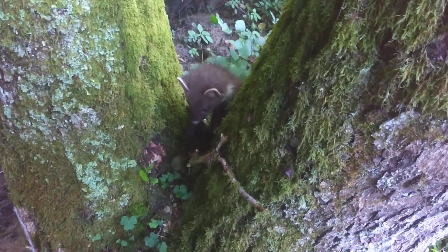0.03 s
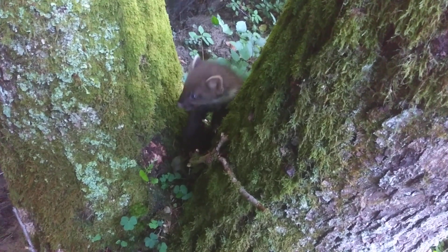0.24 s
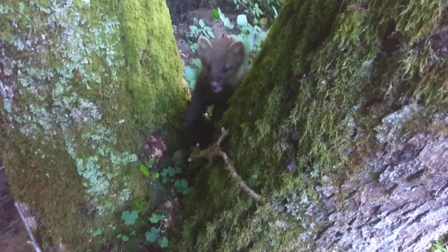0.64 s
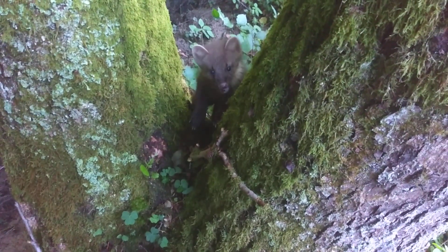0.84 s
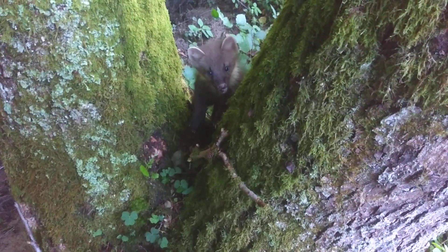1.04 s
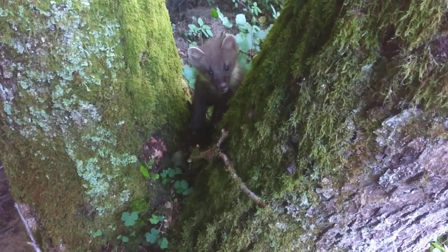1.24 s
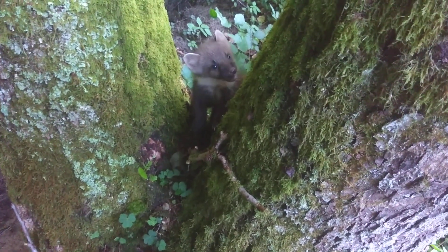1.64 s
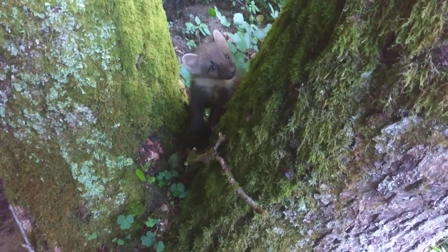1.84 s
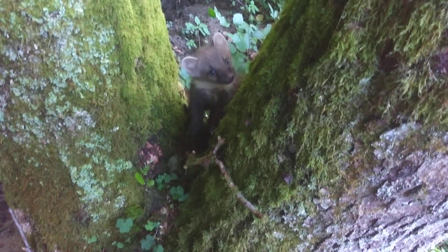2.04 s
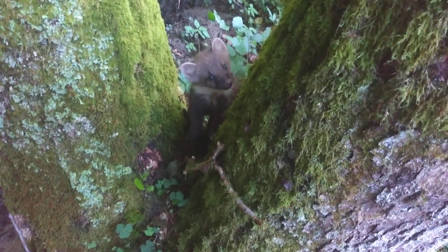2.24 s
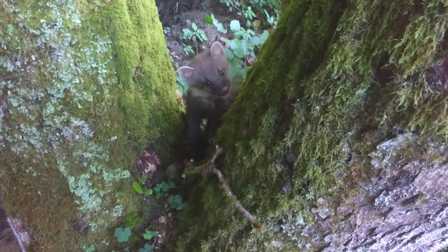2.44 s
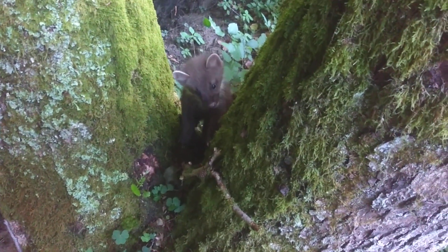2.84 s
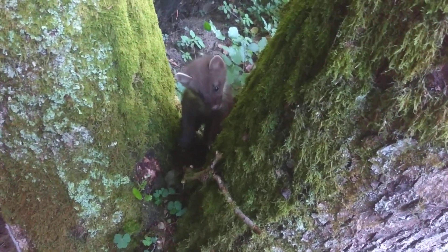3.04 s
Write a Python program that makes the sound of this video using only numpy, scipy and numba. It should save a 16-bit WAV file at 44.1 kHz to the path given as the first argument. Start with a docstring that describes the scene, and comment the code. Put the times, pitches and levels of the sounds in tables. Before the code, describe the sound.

A marten gives one harsh squawk, followed by faint squeaks and soft bumps, then a long fluttering growl that opens into a snarl. It is close to the microphone, with steady distant forest hiss behind.

```python
"""In a forest, a marten in the fork of a mossy tree gives one harsh squawk, then a long fluttering
growl whose mouth opens, closes and opens again into a snarl. Its voice is uneven vocal pulses and
breath ringing in the throat and mouth, reflected off the trunks. Faint squeaks and soft bumps lie over
the steady far hiss of the forest. The stereo microphone has two unequal ports, and the recorder
widens the image by delayed cross-feed."""
import sys
import numpy as np
from scipy import signal
from scipy.fft import rfft, irfft
from scipy.io import wavfile
from scipy.ndimage import uniform_filter1d
from numba import njit

SR = 44100
rng = np.random.default_rng(int(sys.argv[2]) if len(sys.argv) > 2 else 0)


def materialize(psi):
    """Save the field psi as 16-bit PCM at rate SR to the path in sys.argv[1].

    A 1-D psi becomes a single channel; in a 2-D psi each row is a channel.
    """
    bounded = np.clip(np.atleast_2d(psi).T, -1, 1)
    quanta = np.round(bounded * 32767).astype(np.int16)
    wavfile.write(sys.argv[1], SR, quanta)


N = 141120
T = np.arange(N) / SR
BIN_HZ = np.arange(N // 2 + 1) * SR / N


def from_db(db):
    """Decibels to gain."""
    return 10 ** (np.asarray(db) / 20)


def rms_one(x):
    """Scale to rms 1."""
    return x / np.sqrt(np.mean(x ** 2) + 1e-20)


def in_time(rows):
    """Each column after time_s as a curve in time."""
    time_s, *columns = np.transpose(rows)
    return [np.interp(T, time_s, column) for column in columns]


def at_bins(points):
    """A table over log frequency, read at every spectral bin."""
    hz, value = np.transpose(points)
    return np.interp(np.log(BIN_HZ + 1), np.log(hz), value)


def cut(x, hz, kind, order=2):
    """Butterworth filter; kind names the side that passes."""
    return signal.sosfilt(signal.butter(order, hz, kind, fs=SR, output="sos"), x)


def drift(hz):
    """Random wander below hz, of rms 1."""
    return rms_one(cut(rng.standard_normal(N + SR), hz, "low")[SR:])


def even(x):
    """Hold the rms at 1 over about one flutter beat."""
    return x / np.sqrt(np.abs(uniform_filter1d(x * x, size=1000)) + 1e-12)


def swell(start_s, length_s):
    """A rounded rise and fall."""
    return np.sin(np.pi * np.clip((T - start_s) / length_s, 0, 1))


def sounding(rows):
    """A soft-edged gate, open from a call's first row to its last."""
    return uniform_filter1d(1. * (T > rows[0][0]) * (T < rows[-1][0]), size=400)


def forest_hiss():
    """Smooth far noise, alike at both microphone ports around 500 Hz."""
    # colour of the hiss: frequency_hz, relative_db
    spectrum = [(25, -34), (60, -23.5), (120, -1.5), (250, 2.5), (500, -2.5), (800, -2), (1300, -4.5),
                (2200, -7), (3600, -4.5), (5500, -10), (8500, -19), (12000, -21), (15500, -22)]
    # its slow rise and fall: time_s, level_db
    loudness = [(0, -58), (.15, -58), (.45, -52.5), (.85, -52), (1.3, -54.5), (2.1, -54.5), (3.0, -54),
                (3.2, -55)]
    # its likeness at the two ports: frequency_hz, correlation
    likeness = [(100, 0.046), (500, 1), (1200, 0), (3000, 0), (8000, 0.0094)]
    # the side it leans to: frequency_hz, left_minus_right_db
    lean = [(150, -4), (600, 13.5), (1800, -3.5), (4000, 8)]
    alike = np.clip(at_bins(likeness), -.99, .99)
    mid, side = rfft(rng.standard_normal((2, N))) * from_db(at_bins(spectrum))
    ports = np.sqrt(1 + alike) * mid + np.sqrt(1 - alike) * side * [[1], [-1]]
    ports *= from_db(at_bins(lean) * [[.5], [-.5]])
    return from_db(in_time(loudness)[0]) * rms_one(irfft(ports, N))


def bumps():
    """Soft, dull knocks, each a brief swell of one tone."""
    # the knocks: start_s, length_s, pitch_hz, level_db
    knocks = [(.68, 0.025, 110, -55), (.865, 0.028, 820, -59), (1.06, 0.018, 178, -52.5),
              (1.657, .05, 60, -70.5), (1.961, 0.012, 163.6, -55)]
    return sum(from_db(db) * swell(start, length) ** 2 * np.sin(2 * np.pi * hz * (T - start))
               for start, length, hz, db in knocks)


def scatter(x, t60_s):
    """A dense dying spray of reflections, of unit energy, starting 1 ms after the direct sound."""
    tail = rng.standard_normal(SR) * from_db(-60 * T[:SR] / t60_s) * (T[:SR] > .001)
    return signal.fftconvolve(x, tail / np.linalg.norm(tail))[:N]


def reflections(call):
    """Quick reflections off the near trunks, wide in the treble, and the forest's faint longer tail."""
    bark_t60_s, forest_t60_s = .012, .48
    bright, treble = cut(call, 680, "high"), cut(call, 2850, "high", order=1)
    bark_mid = from_db(-9.5) * scatter(bright, bark_t60_s)
    bark_side = from_db(-1) * scatter(treble, bark_t60_s) * [[1], [-1]]
    forest = from_db(-23.5) * np.array([scatter(bright, forest_t60_s) for _ in range(2)])
    return bark_mid + bark_side + forest


def squeaks():
    """Thin, wavering whistles, each a short glide."""
    # the whistles: start_s, length_s, from_hz, to_hz, level_db
    whistles = [(0.734, 0.018, 3100, 3040, -49), (0.747, 0.021, 3220, 3300, -55),
                (.771, 0.019, 3060, 3260, -55), (0.791, 0.018, 3350, 3280, -56),
                (0.805, 0.025, 3140, 3075, -55), (2.373, 0.054, 4960, 4440, -56)]
    waver = 1 + .05 * drift(470)
    sound = np.zeros(N)
    for start, length, from_hz, to_hz, db in whistles:
        hz = np.interp(T, [start, start + length], [from_hz, to_hz]) * waver
        sound += from_db(db) * swell(start, length) * np.sin(2 * np.pi * np.cumsum(hz) / SR)
    return sound


@njit
def resonate(x, angle, radius):
    """Two-pole resonance with a moving centre."""
    y = np.zeros(len(x))
    for i in range(2, len(x)):
        drive = (1 - radius * radius) / 2 * (x[i] - x[i - 2])
        y[i] = drive + 2 * radius * np.cos(angle[i]) * y[i - 1] - radius * radius * y[i - 2]
    return y


def formant(x, hz, width_hz):
    """A throat resonance applied twice for steep skirts; rms 1."""
    angle = 2 * np.pi * hz / SR * np.ones(N)
    radius = np.exp(-np.pi * width_hz / SR)
    return rms_one(resonate(resonate(x, angle, radius), angle, radius))


def bank(x, rows):
    """Fixed resonances side by side."""
    return sum(from_db(db) * formant(x, hz, width_hz) for hz, width_hz, db in rows)


def vocal_folds(hz, beat, swing, jitter, jitter_hz, shimmer_db):
    """Folds pulled by the flutter: the fundamental, uneven pulses, and air let through in each cycle."""
    steady = np.cumsum(hz) / SR
    wander = np.cumsum(hz * (swing * beat + jitter * drift(jitter_hz))) / SR
    sway = cut(wander, 12, "high")
    cycles = steady + sway
    strength = from_db(shimmer_db * drift(375))
    pulses = np.diff(np.floor(np.maximum.accumulate(cycles)), prepend=0) * strength
    air = rng.standard_normal(N) * np.exp(-2.2 * (cycles % 1)) * strength
    tone = np.sqrt(2) * np.cos(2 * np.pi * (steady + .68 * sway))  # takes only part of the sway
    return tone, rms_one(pulses), rms_one(air)


def spit():
    """A short burst of bright noise that ends the squawk."""
    # its rise and fall: time_s, level_db
    loudness = [(.33, -94), (.385, -73), (.415, -60), (.44, -57.5), (.46, -91)]
    # its resonances: centre_hz, width_hz, relative_db
    bands = [(4870, 1500, -6), (8150, 650, 4), (12700, 3200, -4)]
    return from_db(in_time(loudness)[0]) * rms_one(bank(rng.standard_normal(N), bands))


def squawk():
    """A harsh short call of pulses and breath whose pitch drops as it ends in a spit."""
    # course of the call: time_s, pitch_hz, fundamental_db, throat_db, treble_db
    call = [(.14, 270, -65, -78, -93), (.213, 275.3, -67, -55, -76), (.221, 278.3, -46, -50, -62),
            (.25, 293, -51.5, -45, -59), (.28, 275.7, -43.5, -44.5, -52), (.335, 302, -43, -37.5, -43.5),
            (.395, 279.3, -41.5, -39.5, -46), (.422, 243, -43, -43, -40), (.443, 225, -82, -62, -40),
            (.462, 222.1, -73, -58, -67)]
    # moving resonances: time_s, first_hz, second_hz, upper_hz, upper_relative_db
    mouth = [(.22, 806, 1580, 3400, -2), (.33, 880, 1610, 3500, -11), (.39, 875, 1690, 3850, -4),
             (.425, 770, 1760, 4180, -2), (.45, 820, 1660, 4160, 8.5)]
    # fixed treble resonances: centre_hz, width_hz, relative_db
    treble_bands = [(2820, 330, 1), (5400, 1200, -26), (8300, 900, -32)]
    hz, tone_db, throat_db, treble_db = in_time(call)
    first_hz, second_hz, upper_hz, upper_db = in_time(mouth)
    flutter_hz = 112 * (1 + .18 * drift(32))
    beat = np.sin(2 * np.pi * np.cumsum(flutter_hz) / SR)
    tone, pulses, air = vocal_folds(hz, beat, swing=.06, jitter=.06, jitter_hz=150, shimmer_db=1.8)
    voice = (pulses + 1.25 * air) * (1 + .13 * beat)
    rasp = (.5 * pulses + air) * (1 + .099 * beat)
    throat = (formant(voice, first_hz, width_hz=270)
              - from_db(-3) * formant(voice, second_hz, width_hz=550)
              + from_db(-3.5) * formant(voice, 580, width_hz=310))
    treble = from_db(upper_db) * formant(rasp, upper_hz, width_hz=570) + bank(rasp, treble_bands)
    return sounding(call) * (from_db(tone_db) * tone + from_db(throat_db) * even(throat)
                             + from_db(treble_db) * even(treble) + spit())


def growl():
    """A low voice chopped by a flutter; each beat starts with a wet snap, bright with the mouth open."""
    # course of the call: time_s, pitch_hz, fundamental_db, throat_db, treble_db
    call = [(1.34, 248.2, -67, -95, -97), (1.37, 250.1, -62, -105, -70), (1.46, 252.8, -61, -95, -93),
            (1.5, 262.7, -55, -62, -63.5), (1.59, 264.9, -53, -55, -59), (1.66, 270.3, -47, -50.5, -58),
            (1.76, 259.4, -48, -52, -69), (1.89, 260.4, -45.5, -52.5, -72),
            (1.98, 262.2, -49.5, -53.5, -93), (2.1, 265, -45.5, -52, -69), (2.33, 265.9, -46.5, -50, -66.5),
            (2.52, 267, -45.5, -51, -62.5), (2.62, 273.7, -44.5, -45, -53),
            (2.81, 266.5, -43.5, -43.5, -50), (2.9, 255, -46.5, -47.5, -52),
            (2.93, 251.8, -53, -55.5, -58.5), (2.96, 249.3, -84, -81, -85)]
    # resonances as the mouth moves: time_s, first_hz, second_hz, second_relative_db, nasal_relative_db
    mouth = [(1.5, 930, 2040, -3, -7), (1.62, 1070, 2000, -2, -5), (1.69, 860, 1580, -11, -18),
             (1.75, 760, 1030, -7, -11), (1.86, 646, 966, -7.5, -4), (2.45, 646, 990, -2.5, 15),
             (2.53, 756.3, 1267, -28, 1.5), (2.58, 816.3, 1630, -4, -15), (2.66, 890, 1614, 4, -4),
             (2.8, 929.2, 1852, -0.5, -4), (2.92, 900.6, 1840, 1.5, 2.5)]
    # fixed treble resonances: centre_hz, width_hz, relative_db
    treble_bands = [(3310, 1300, 9), (3855, 920, 1.5), (5090, 430, 1.5), (6000, 1240, 0), (6880, 790, -5),
                    (12300, 1900, -16)]
    # flutter of the throat: time_s, rate_hz, depth
    flutter = [(1.4, 49, 1.4), (1.58, 49, 0.68), (1.8, 42, 0.3), (2.2, 45, 0.1), (2.9, 46.9, 0.29)]
    hz, hum_db, throat_db, treble_db = in_time(call)
    first_hz, second_hz, second_db, nasal_db = in_time(mouth)
    flutter_hz, depth = in_time(flutter)
    beats = np.cumsum(flutter_hz * (1 + .05 * drift(25))) / SR
    beat = np.sin(2 * np.pi * beats)
    snap = np.exp(-3 * (beats % 1))
    hz *= 1 + .01 * drift(14)
    tone, pulses, air = vocal_folds(hz, beat, swing=.11, jitter=.055, jitter_hz=160, shimmer_db=2)
    voice = (pulses + .6 * air) * (1 + .45 * depth * beat)
    rasp = (pulses + 1.75 * air) * (depth * snap + .23)  # some rasp stays between beats
    throat = (formant(voice, first_hz, width_hz=640)
              - from_db(second_db) * formant(voice, second_hz, width_hz=400)
              + from_db(nasal_db) * formant(voice, 560, width_hz=340))
    chest_rumble = from_db(-18.5) * formant(air, 260, width_hz=164)
    hum = (tone + chest_rumble) * (1 + depth * beat)
    return sounding(call) * (from_db(hum_db) * even(hum) + from_db(throat_db) * even(throat)
                             + from_db(treble_db) * even(bank(rasp, treble_bands)))


def scene():
    """The marten between the trunks, centred on the microphone, with the forest around it."""
    marten = cut(squawk() + growl() + squeaks(), 93, "high")
    return marten + reflections(marten) + bumps() + forest_hiss()


def record(dry):
    """Two unequal microphone ports; each channel has the other subtracted a moment later to widen it."""
    # imbalance of the ports: frequency_hz, right_minus_left_db
    port_tilt = [(200, -2.4), (1200, 5.5), (2400, -3.2), (4200, 8.5), (9000, 8), (15000, 16.5)]
    cross_share, delay_samples = .67, 20
    rumble_cut_hz, top_cut_hz = 19, 15700
    ports = irfft(rfft(dry) * from_db(at_bins(port_tilt) * [[-.5], [.5]]), N)
    opposite = cut(ports[::-1], 113, "high", order=1)
    delayed = np.pad(opposite, ((0, 0), (delay_samples, 0)))[:, :N]
    wide = ports - cross_share * delayed
    bass_lift = 1.22 * cut(wide, 470, "low", order=1)
    warm = cut(wide + bass_lift, rumble_cut_hz, "high")
    return irfft(rfft(warm) / (1 + (BIN_HZ / top_cut_hz) ** 300), N)


dry = scene()
out = record(dry)
materialize(out)
```